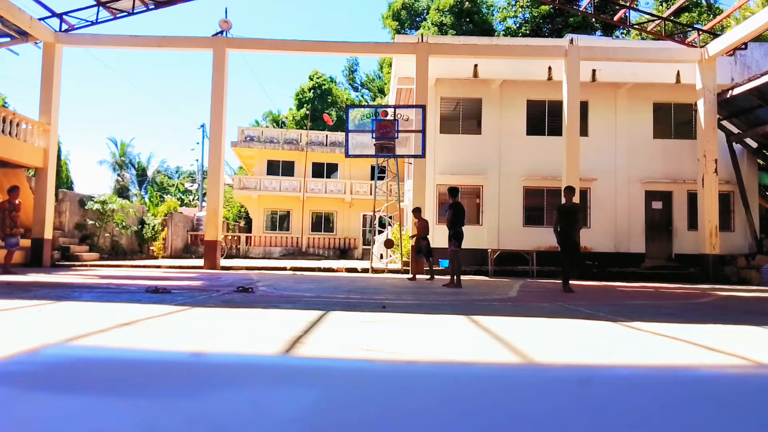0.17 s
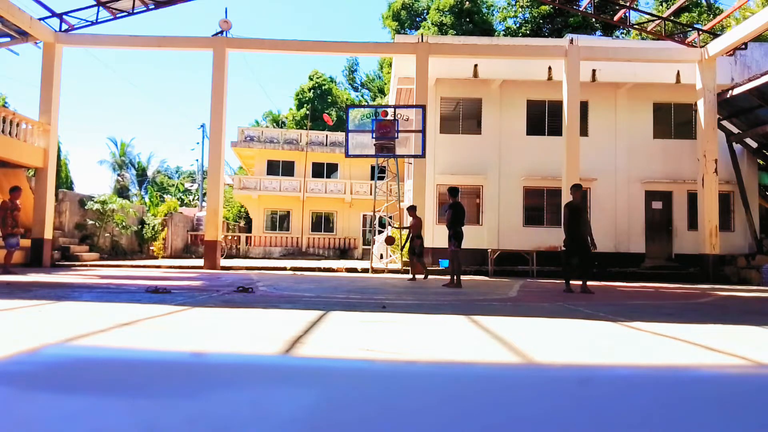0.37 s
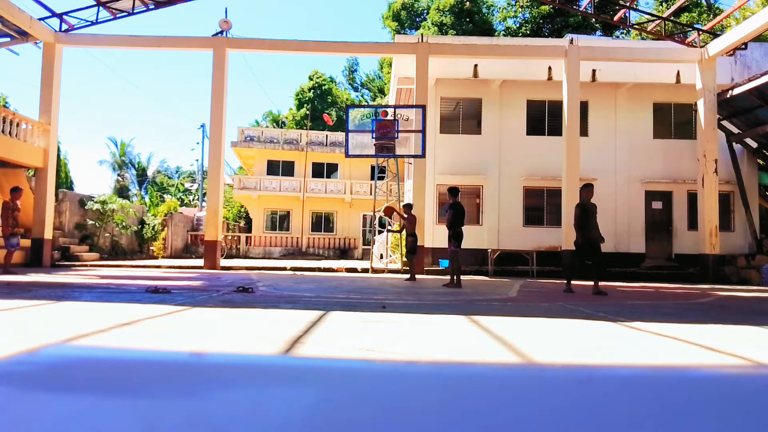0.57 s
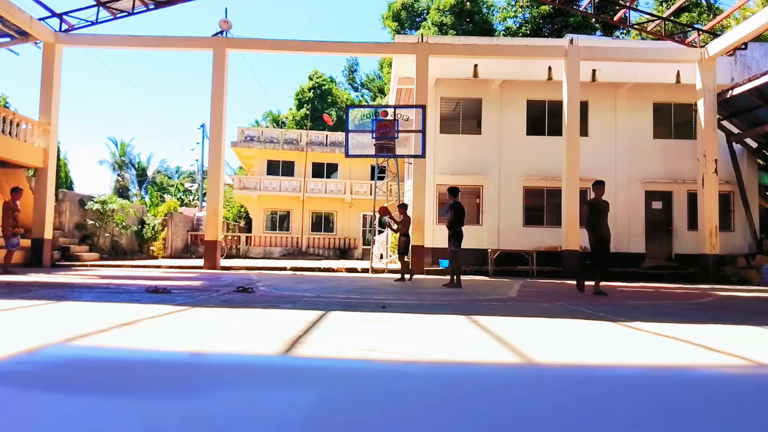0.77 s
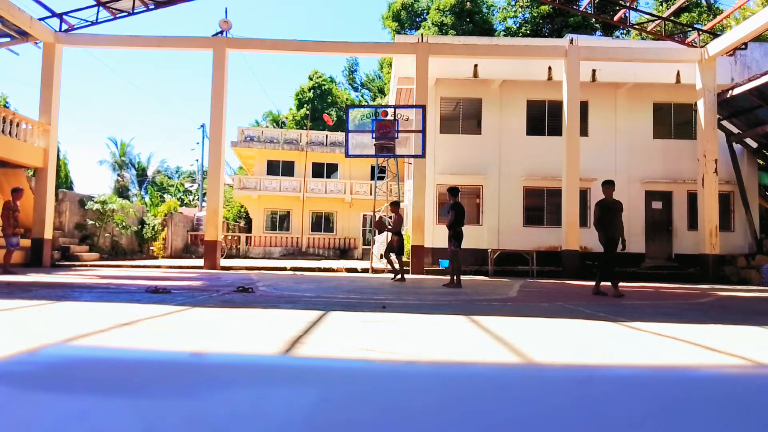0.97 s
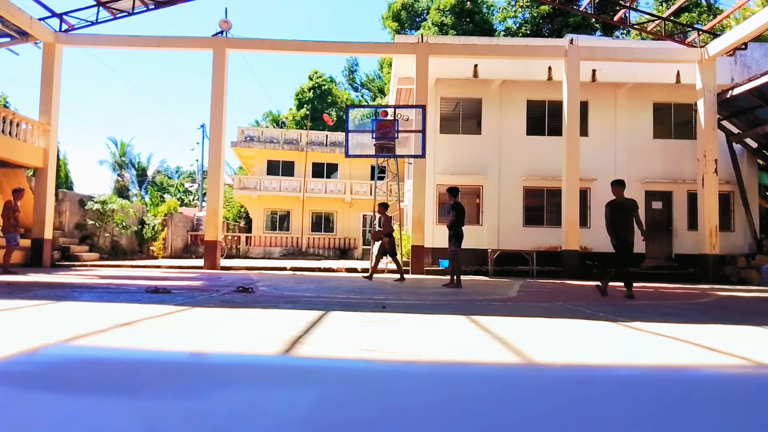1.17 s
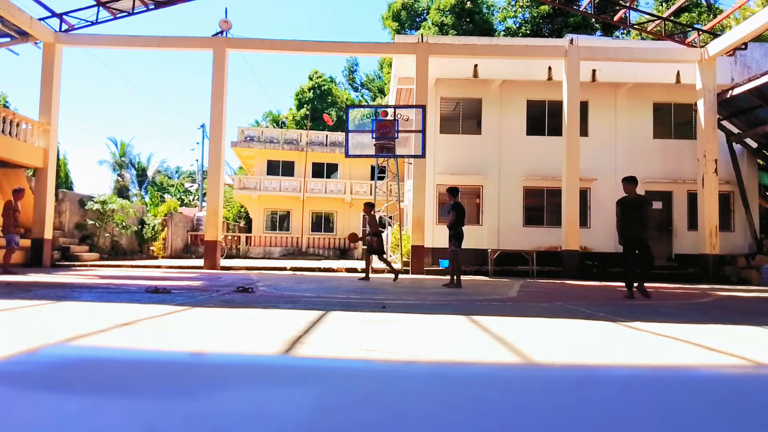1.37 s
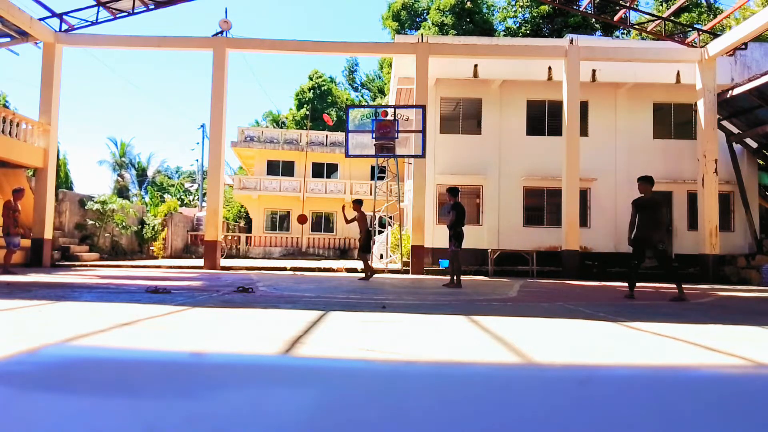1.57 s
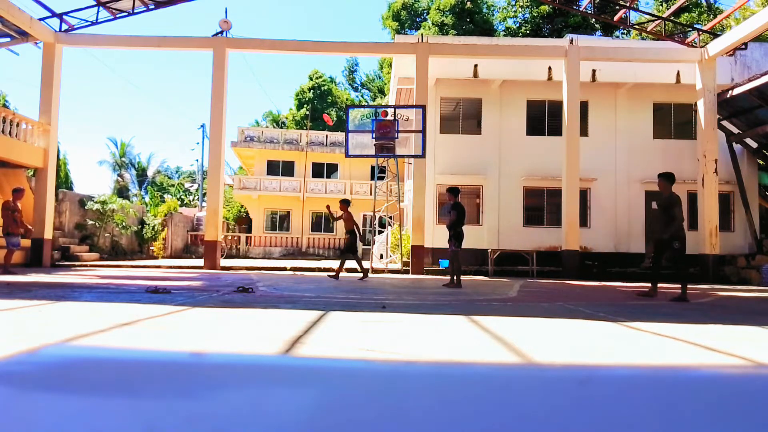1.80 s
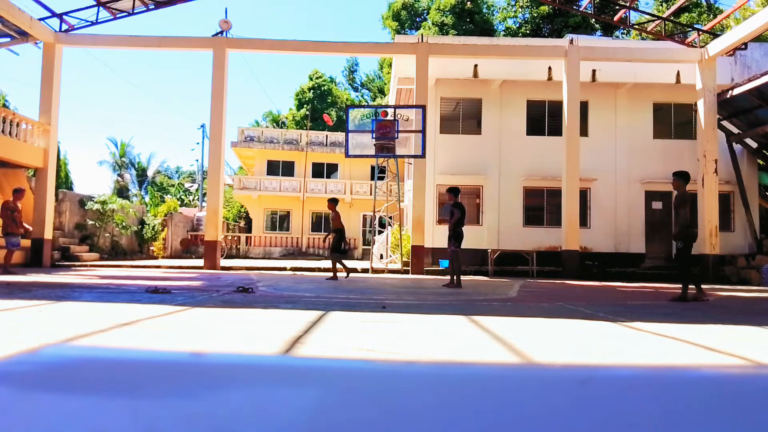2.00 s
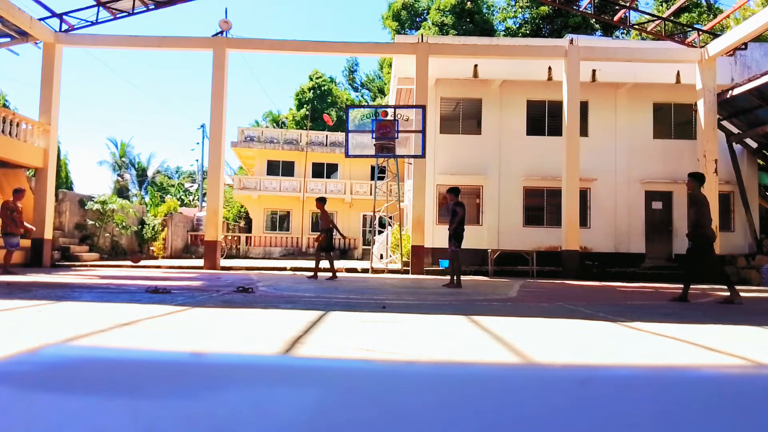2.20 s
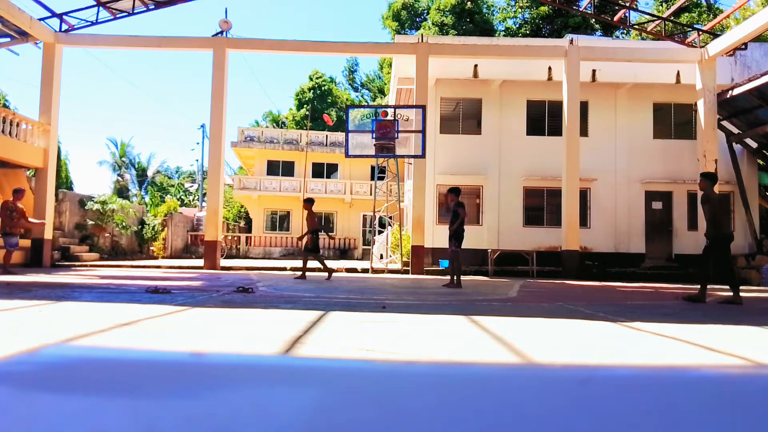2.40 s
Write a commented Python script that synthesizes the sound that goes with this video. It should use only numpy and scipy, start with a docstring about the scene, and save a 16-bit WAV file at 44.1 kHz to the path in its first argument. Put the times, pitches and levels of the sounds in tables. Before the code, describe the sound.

Two ringing basketball bounces, one near and one farther, with light sandal scuffs on concrete.

```python
"""First comes the hard, near smack of a basketball on a roofed concrete court, then a softer, farther one.
Each bounce is a slap, a low thump and the ping of the air inside; walls and roof throw it back and ring on.
Between the bounces the players' sandals scuff and tap on the concrete.
Underneath lies a faint bed of outdoor air with two distant insect trills."""
import sys
import numpy as np
from scipy import signal
from scipy.fft import rfft, irfft
from scipy.io import wavfile
from scipy.ndimage import uniform_filter1d

SR = 44100
rng = np.random.default_rng(int(sys.argv[2]) if len(sys.argv) > 2 else 0)


def transcribe(signal):
    """Save signal, clipped to [-1, 1], as a 16-bit WAV file at the path in sys.argv[1]."""
    frames = np.atleast_2d(signal).T
    limited = np.clip(frames, -1, 1)
    pcm = np.round(limited * 32767).astype(np.int16)
    wavfile.write(sys.argv[1], SR, pcm)


N = 108045

# The ball's hits. Each row: start in seconds, level in dB, thump pitch in Hz, treble cutoff in Hz,
# ping level in dB, reverb level in dB, reverb pre-delay in seconds.
BOUNCES = [(0.2004, -1.5, 125, 4000, -6, -15.5, .022), (2.0847, -10.5, 133.6, 3100, -8.5, -24.5, .013)]
# Modes of the ball's shell and air. Each row: pitch in Hz, level in dB, t60 in seconds.
BALL_MODES = [(278, -21, 0.15), (439, -16, 0.023), (1173, -15, 0.027), (1470, -14.5, 0.027),
              (1635, -22.5, 0.056), (1924, -21, 0.05), (1880, -11.5, 0.022), (2230, -10, 0.011),
              (2680, -16, 0.017), (3530, -18, 0.013), (4480, -30.5, 0.028)]
# Shell ring as the ball leaves the floor. Each row: pitch in Hz, level in dB, t60 in seconds.
LIFT_MODES = [(1200, -16, 0.014), (1835, -9, 0.033), (1962, -22.5, 0.034)]
# Long ring of the air in the ball. Each row: pitch in Hz, level in dB, t60 in seconds.
PING_MODES = [(1097, -29, 1.75), (1168, -53, 4.8), (1363, -25.5, 1.19), (1680, -67.5, 2.3)]
# Echoes off walls and roof. Each row: arrival in seconds, slap level in dB,
# clean reflection in dB relative to that level, thump level in dB.
ECHOES = [(0.229, -8, 0, -1.5), (0.2373, -13, -5, -2), (0.279, -11, -11, -15), (0.2877, -19, -3, -11),
          (0.3337, -5.5, -12, -7), (0.377, -4.5, -39, -9), (0.4263, -12, -8, -9.5),
          (2.1117, -11.5, -6, -13), (2.117, -17, 2.5, -37), (2.1749, -27, -18, -22.5),
          (2.2148, -18, 1.5, -34), (2.2228, -21.5, -3, -13)]
# Reverb colour, one curve for each bounce's spot. Each row: frequency in Hz, spectral level in dB.
COURT_COLOURS = [
    [(29, -49), (50, -35), (91, 2), (146, 1), (169, 0.5), (214, -18), (279, -10), (329, -18), (408, -6),
     (494, -11.5), (584, -20.5), (690, -15.5), (816, -16.5), (876, -21.5), (1140, -12.5), (1550, -17.5),
     (1880, -17), (2450, -22), (3260, -24.5), (5380, -42.5), (8070, -43), (9530, -52.5), (15000, -69)],
    [(29, -39), (50, -21), (140, 2.5), (200, -8), (236, 2), (314, -15.5), (362, -11), (627, -18),
     (898, -15.5), (987, -14), (1090, -6), (1170, -14.5), (1710, -10), (3760, -29.5), (5770, -46),
     (8070, -48), (15000, -80)],
]
# The court's decay. Each row: frequency in Hz, t60 in seconds.
COURT_DECAY = [(70, 1.14), (130, 0.97), (220, 1.61), (450, 1.49), (1100, 1.78), (2200, 1.53), (5000, 1.24),
               (9000, 1.14), (15000, 1)]
# Sandal scuffs. Each row: start in seconds, length in seconds, level in dB, rasp pitch in Hz,
# then rasp and sand hiss in dB relative to the sole's rub.
SCUFFS = [(0.823, 0.068, -46.5, 2100, 4.5, -12.5), (.850, 0.17, -41, 1810, -1.5, -32),
          (1.364, 0.068, -41.5, 2500, -15, -16.5), (1.39, .08, -39.5, 2270, 1.5, -24),
          (1.804, .13, -52.5, 2200, -10, -20), (2.03, 0.12, -50.5, 2400, -33, -15.5)]
# A sole rubbing on concrete. Each row: frequency in Hz, spectral level in dB.
SOLE_COLOUR = [(200, -37), (900, -9), (1500, -9), (2200, 3.5), (3200, 0), (4500, -9.5), (6500, -16),
               (8100, -12), (9500, -29), (13000, -41.5), (15000, -41)]
# Sand hissing under a sole. Each row: frequency in Hz, spectral level in dB.
SAND_COLOUR = [(3000, -21), (6000, 1), (8300, 10), (11000, 1), (13000, -28), (15000, -4)]
# Light footfalls. Each row: start in seconds, level in dB, resonance in Hz.
FOOTFALLS = [(0.094, -39, 1850), (.838, -40, 273), (1.655, -45.5, 775), (1.823, -47, 2880),
             (1.925, -54, 210)]
# Outdoor air. Each row: frequency in Hz, spectral level in dB.
AIR_COLOUR = [(20, -10.5), (45, -5.5), (70, -4), (120, -6.5), (200, -11.5), (310, -15), (480, -15.5),
              (1030, -17.5), (1600, -17.5), (2200, -20), (3350, -24), (5000, -32.5), (5600, -31),
              (6500, -47), (8200, -36), (10000, -61), (15000, -56)]
# Insects in the trees. Each row: start in seconds, length in seconds, pitch in Hz, level in dB.
TRILLS = [(0, 0.35, 5630, -76), (1.241, .14, 8170, -73)]

SLAP_DB, SLAP_S, CRACK_DB, LIFT_S = -27, 0.00048, -16, 0.0093
THUMP_DB, THUMP_HOLD_S, THUMP_RELEASE_S, THUMP_LAG_S = -9, 0.0099, 0.004, 0.00081
SCATTER_DB, SCATTER_T60_S, ECHO_CRACK_DB = -10, 0.049, -15
REVERB_BUILD_S = 0.0056
DRAG_ATTACK_S, DRAG_RELEASE_S, GRIT_SPREAD_DB = 0.016, 0.054, 3
DRAG_DRY_DB, DRAG_SEND_DB, TAP_SEND_DB = -3, -2, -15.5
FEET_PREDELAY_S, FEET_CROSSOVER_HZ = 0.021, 3670
LINGER_DB, LINGER_HZ, AIR_DB = -52, 1204, -51


def bounces():
    """The lead layer: each hit with its ping, the court's tail and the echoes before the next hit."""
    out = np.zeros(N)
    ends = [row[0] for row in BOUNCES[1:]] + [np.inf]
    for bounce, end, colour in zip(BOUNCES, ends, COURT_COLOURS):
        start, db, thump_hz, cutoff_hz, ping_db, reverb_db, predelay = bounce
        slap, thump = ball(thump_hz, cutoff_hz)
        out += at(start, undb(db) * (slap + thump) + undb(ping_db) * ring(PING_MODES))
        out += at(start + predelay, undb(reverb_db) * court_reverb(colour))
        for arrival, slap_db, clean_db, thump_db in ECHOES:
            if start < arrival < end:
                out += at(arrival, undb(slap_db) * wall_echo(slap, clean_db) + undb(thump_db) * thump)
    return out


def ball(thump_hz, cutoff_hz):
    """The shell slaps the floor, flattens and springs back, ringing again as it lifts off."""
    t = np.arange(N) / SR
    pulse = -undb(SLAP_DB) * t / SLAP_S * np.exp(1 - t / SLAP_S)
    crack = undb(CRACK_DB) * rng.standard_normal(N) * fade(t60=0.017)
    slap = pulse + crack + ring(BALL_MODES) + at(LIFT_S, ring(LIFT_MODES))
    envelope = np.exp(-np.maximum(t - THUMP_HOLD_S, 0) / THUMP_RELEASE_S)
    thump = undb(THUMP_DB) * np.sin(2 * np.pi * thump_hz * t) * envelope
    return lowpass(slap, cutoff_hz), at(THUMP_LAG_S, thump)


def wall_echo(slap, clean_db):
    """A wall or the roof returns the slap as a scattered smear, a dull crack and a clean copy."""
    crack = lowpass(rng.standard_normal(N), hz=1510) * fade(SCATTER_T60_S)
    smear = convolve(slap, reflections(SCATTER_T60_S))
    return undb(SCATTER_DB) * smear + undb(ECHO_CRACK_DB) * crack + undb(clean_db) * slap


def court_reverb(colour):
    """The court's diffuse tail swells quickly, then each band dies at its own rate."""
    spectrum, freqs = rfft(noise(colour)), np.fft.rfftfreq(N, 1 / SR)
    centres_hz = np.geomspace(50, 16000, 12)
    tail = np.zeros(N)
    for hz, weights in zip(centres_hz, np.eye(len(centres_hz))):
        band = irfft(spectrum * curve(np.c_[centres_hz, weights], freqs), N)
        tail += band * fade(curve(COURT_DECAY, hz))
    return tail * (1 - np.exp(-np.arange(N) / SR / REVERB_BUILD_S))


def footwork():
    """Sandals drag and tap; the court answers, its treble dying first."""
    drags = sandal_drags()
    taps = sum(at(start, undb(db) * resonant_noise(hz, q=3.3) * fade(t60=0.038))
               for start, db, hz in FOOTFALLS)
    highpass = signal.butter(2, FEET_CROSSOVER_HZ, "high", fs=SR, output="sos")
    bright_tail = signal.sosfilt(highpass, reflections(t60=0.98))
    dark_tail = lowpass(reflections(t60=1.42), FEET_CROSSOVER_HZ)
    send = undb(DRAG_SEND_DB) * drags + undb(TAP_SEND_DB) * taps
    wet = convolve(send, dark_tail + bright_tail)
    return undb(DRAG_DRY_DB) * drags + taps + at(FEET_PREDELAY_S, wet)


def sandal_drags():
    """Soles rub, rasp and hiss over the concrete; grit roughens their level."""
    t, drags = np.arange(N) / SR, np.zeros(N)
    for start, length, db, rasp_hz, rasp_db, sand_db in SCUFFS:
        envelope = np.clip(t / DRAG_ATTACK_S, 0, 1) * np.clip((length - t) / DRAG_RELEASE_S + .5, 0, 1)
        flutter = unit(uniform_filter1d(rng.standard_normal(N), size=90))  # grains of about 2 ms
        grit = unit(undb(GRIT_SPREAD_DB * flutter))
        rub = noise(SOLE_COLOUR)
        rasp = undb(rasp_db) * resonant_noise(rasp_hz, q=2.34)
        hiss = undb(sand_db) * noise(SAND_COLOUR)
        drags += at(start, undb(db) * envelope * grit * (rub + rasp + hiss))
    return drags


def insects():
    """Distant trills, each a thin band of noise that swells and falls away."""
    t, trills = np.arange(N) / SR, np.zeros(N)
    for start, length, hz, db in TRILLS:
        arch = np.sqrt(np.abs(np.sin(np.pi * np.clip(t / length, 0, 1))))
        trills += at(start, undb(db) * resonant_noise(hz, q=17) * arch)
    return trills


def background():
    """The bed: the last ring of earlier play hanging in the court, insects and faint outdoor air."""
    linger = undb(LINGER_DB) * resonant_noise(LINGER_HZ, q=1) * fade(curve(COURT_DECAY, LINGER_HZ))
    return linger + insects() + undb(AIR_DB) * noise(AIR_COLOUR)


def ring(modes):
    """Struck modes, each a decaying sine."""
    t = np.arange(N) / SR
    return -sum(undb(db) * np.sin(2 * np.pi * hz * t) * fade(t60) for hz, db, t60 in modes)


def reflections(t60):
    """A decaying cloud of reflections with energy 1."""
    return unit(rng.standard_normal(N) * fade(t60)) / np.sqrt(N)


def noise(colour):
    """Noise of rms 1 with a given colour."""
    gains = undb(curve(colour, np.fft.rfftfreq(N, 1 / SR)))
    return unit(irfft(rfft(rng.standard_normal(N)) * gains, N))


def resonant_noise(hz, q):
    """Noise of rms 1 in one steep-sided resonance."""
    b, a = signal.iirpeak(hz, q, fs=SR)
    return unit(signal.lfilter(b, a, signal.lfilter(b, a, rng.standard_normal(N))))


def undb(db):
    """Decibels to gain."""
    return 10 ** (np.asarray(db) / 20)


def unit(x):
    """Scale to rms 1."""
    return x / np.sqrt(np.mean(x ** 2))


def fade(t60):
    """A decay that falls 60 dB in t60 seconds."""
    return np.exp(-np.log(1000) * np.arange(N) / SR / t60)


def curve(points, hz):
    """Read a table on a log-frequency axis."""
    freqs, values = np.array(points).T
    return np.interp(np.log(hz + 0.0012), np.log(freqs), values)


def convolve(sound, response):
    """Pass a sound through a response."""
    return signal.fftconvolve(sound, response)[:N]


def at(seconds, x):
    """Place a sound on the timeline."""
    return np.r_[np.zeros(max(int(seconds * SR), 0)), x][:N]


def lowpass(x, hz):
    """Two-pole treble cut."""
    return signal.sosfilt(signal.butter(2, hz, fs=SR, output="sos"), x)


def scene():
    """Ball, feet and background, mixed in mono."""
    return (bounces() + footwork() + background())[None]


def record(dry):
    """The recorder clips near full scale, cuts the top and sits on a small steady offset."""
    top_hz, dc_offset = 15500, 0.028
    top_cut = signal.ellip(8, .2, 70, top_hz, fs=SR, output="sos")
    return signal.sosfilt(top_cut, np.clip(dry, -.99, .95)) + dc_offset


dry = scene()
out = record(dry)
transcribe(out)
```